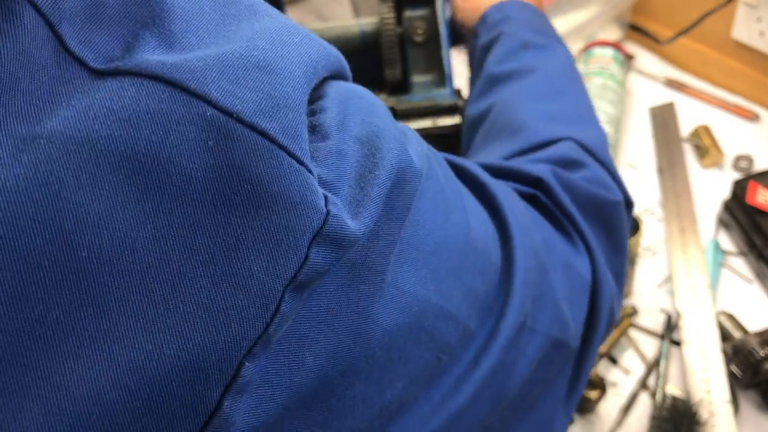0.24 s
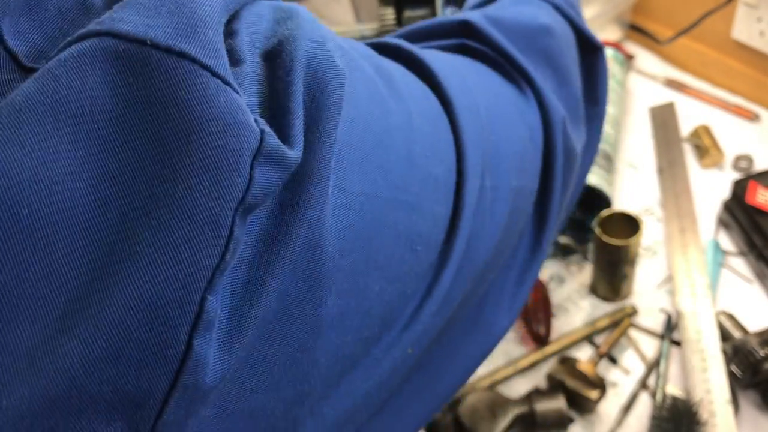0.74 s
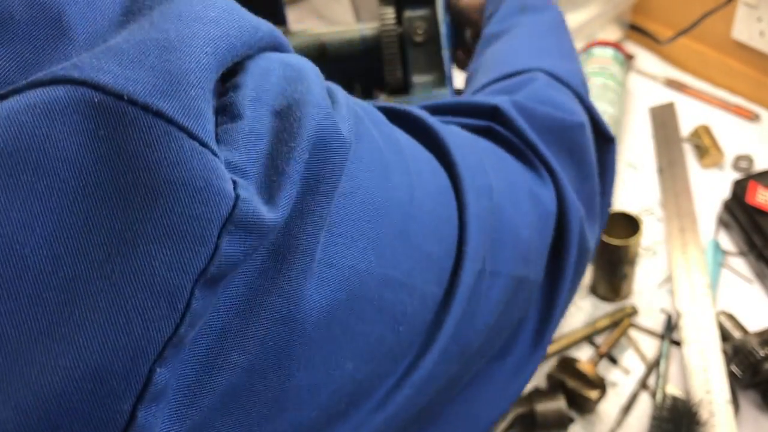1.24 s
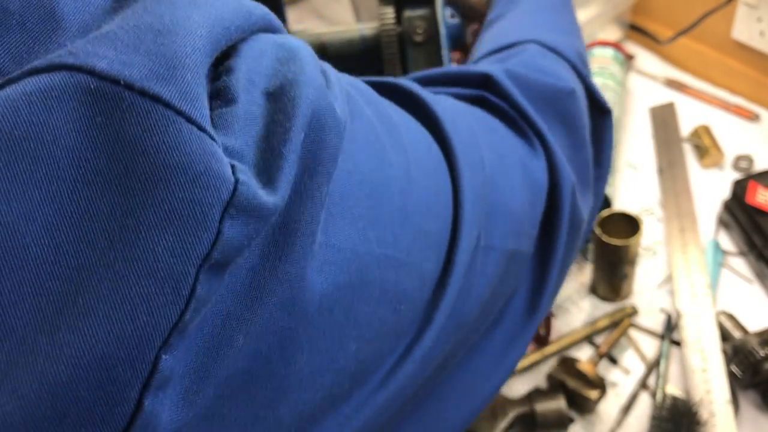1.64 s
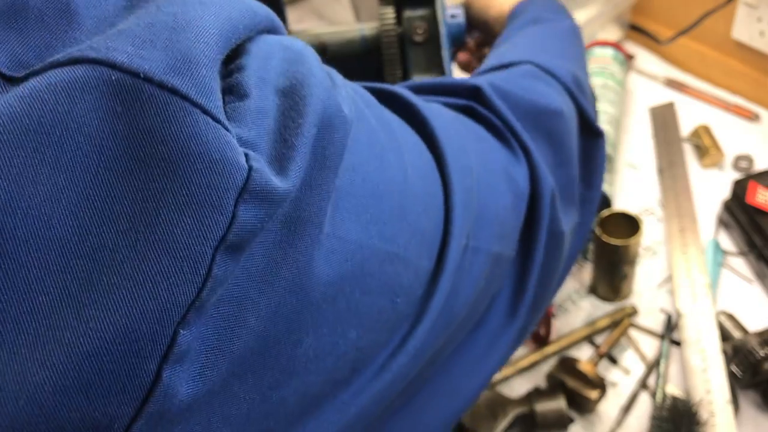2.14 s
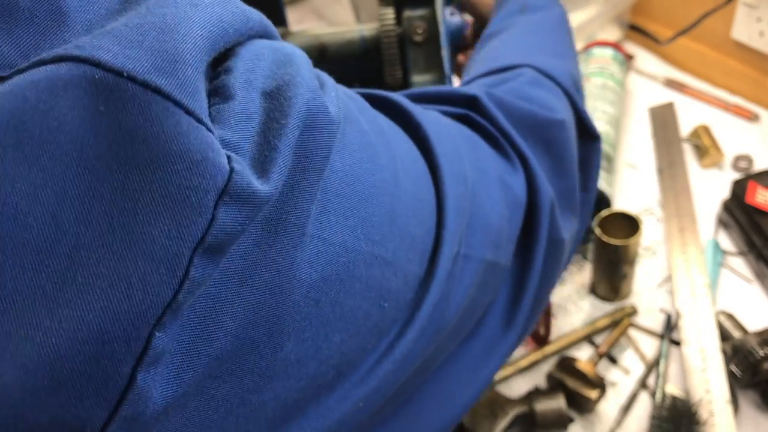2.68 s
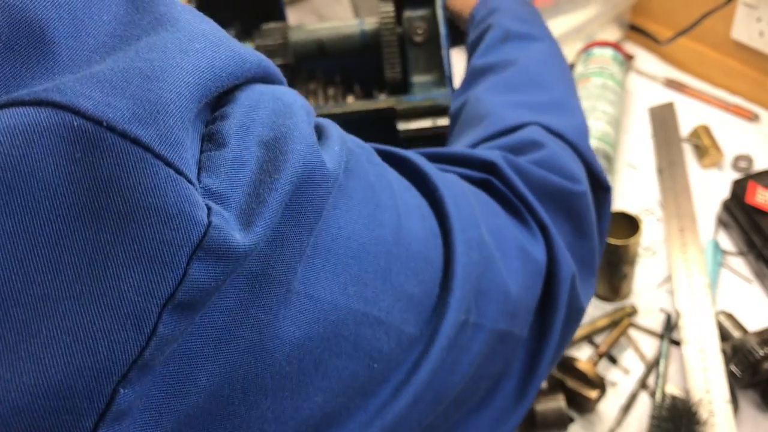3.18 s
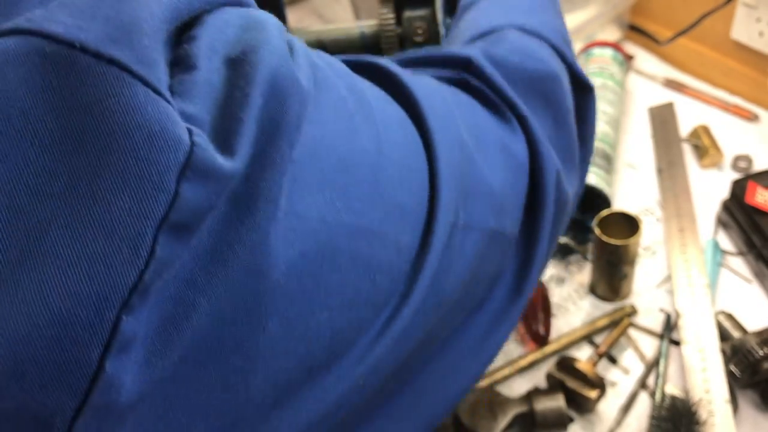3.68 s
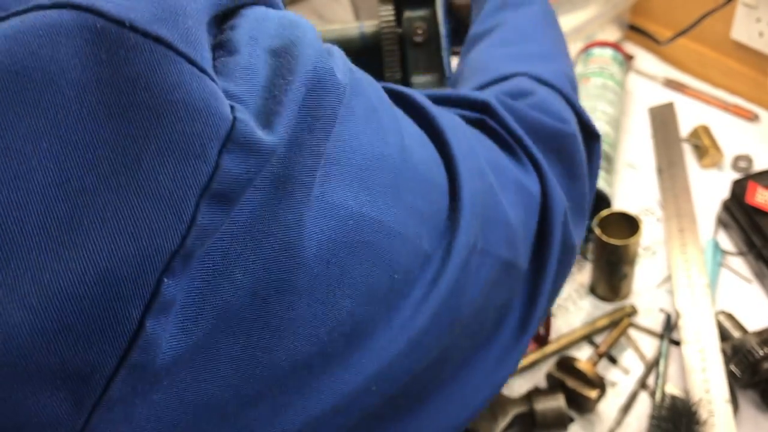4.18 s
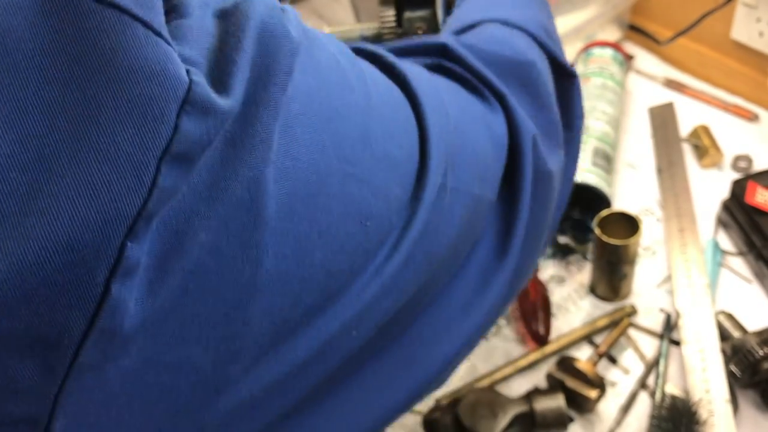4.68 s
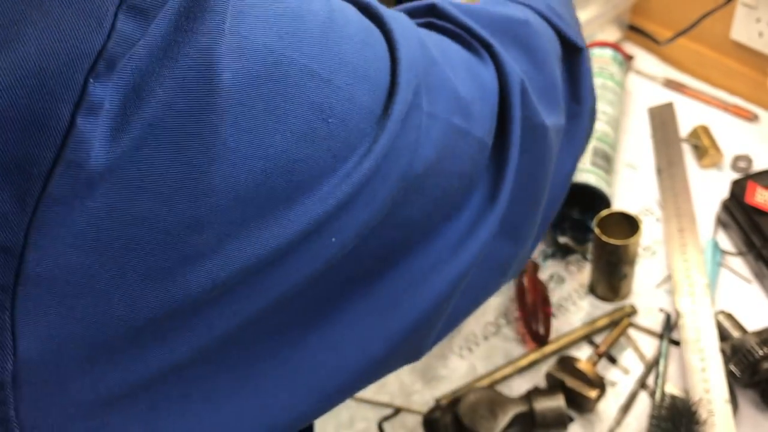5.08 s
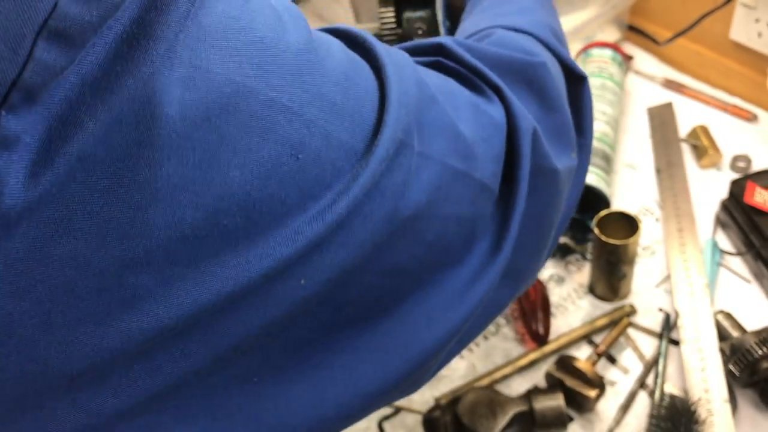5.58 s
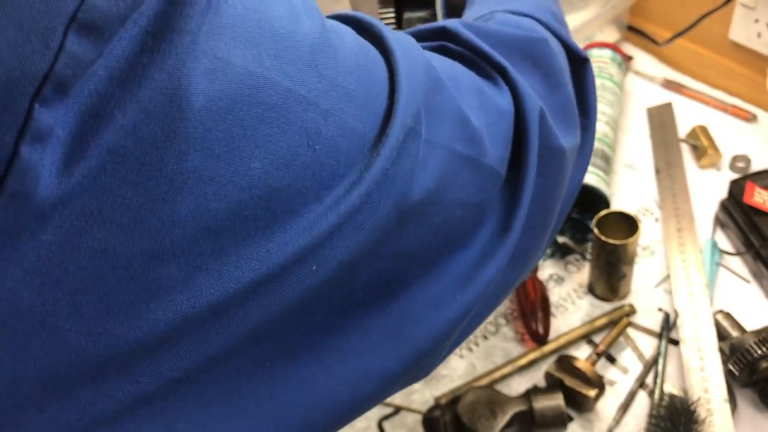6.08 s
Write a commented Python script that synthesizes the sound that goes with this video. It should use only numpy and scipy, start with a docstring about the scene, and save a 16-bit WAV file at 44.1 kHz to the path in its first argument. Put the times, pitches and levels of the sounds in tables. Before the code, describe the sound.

Steel gears are turned slowly by hand, close to one microphone in a small workshop. A spring-loaded ball snaps into its seat together with a loud clunk, then clicks a few more times. In the middle comes a busier run of clunks, taps and bright ticks that thump the bench over a low rolling rumble. Two more snaps and a tiny squeak end it. A sleeve brushes softly over a faint hum.

```python
"""Lathe change gears turned by hand

Close to the bench in a small workshop, one microphone. A spring-loaded ball snaps into its seats, gears
clunk against their stops, teeth tap, and bare steel ticks and squeaks once. Snaps, clunks and taps shake
the bench; the iron lathe bed rings on and the room answers. Underneath, the gears rumble as they roll,
a shaft slides and a sleeve brushes along, over still air and a faint mains hum."""
import sys
import numpy as np
from scipy import signal
from scipy.fft import rfft, irfft
from scipy.io import wavfile
from scipy.ndimage import uniform_filter1d

SR = 44100
rng = np.random.default_rng(int(sys.argv[2]) if len(sys.argv) > 2 else 0)


def waveform_to_disk(signal):
    """Save audio, clipped to [-1, 1], as 16-bit WAV at the path in sys.argv[1]."""
    frames = np.transpose(np.atleast_2d(signal))
    scaled = np.clip(frames, -1, 1) * 32767
    samples = np.round(scaled).astype(np.int16)
    wavfile.write(sys.argv[1], SR, samples)


N = 279152
BLOW_SAMPLES = 8192
HZ = np.fft.rfftfreq(BLOW_SAMPLES, 1 / SR)  # frequency axis of every response
TIME = np.arange(N) / SR


def gain_of(db):
    """Decibels to amplitude."""
    return 10 ** (np.asarray(db) / 20)

def unit_rms(x):
    """Scales to an rms of one."""
    return x / np.sqrt(np.mean(x ** 2) + 1e-20)

def curve(points, hz):
    """Joins (frequency, value) points by straight lines on a log-frequency axis."""
    point_hz, value = np.transpose(points)
    return np.interp(np.log(hz + 1), np.log(point_hz + 1), value)

def add(mix, s, sound):
    """Mixes a sound in at time s."""
    part = mix[round(s * SR):][:len(sound)]
    part += sound[:len(part)]

def noise(response):
    """Steady noise of rms one, coloured by a response."""
    colour = np.interp(np.fft.rfftfreq(N, 1 / SR), HZ, response)
    return unit_rms(irfft(rfft(rng.standard_normal(N)) * colour, N))

def strokes(rows):
    """Gain of hand movements, each swelling and fading in one arch."""
    return sum(gain_of(db) * np.cos(np.pi * np.clip((TIME - middle) / length, -.5, .5))
               for middle, length, db in rows)

def body(modes, floor):
    """Response of a part: resonance peaks over a floor of dense lesser modes."""
    peaks = sum(gain_of(db) ** 2 / (1 + 2 * ((HZ - hz) / width) ** 2) ** 2 for hz, width, db in modes)
    return np.sqrt(peaks + gain_of(curve(floor, HZ)) ** 2)

def ring(response):
    """Minimum-phase spectrum of a response, so that it rings only after the blow."""
    log_gain = np.log(np.maximum(response, 1e-5))
    mirrored = np.concatenate([log_gain, log_gain[-2:0:-1]])
    return np.exp(np.conj(signal.hilbert(mirrored)))[:len(HZ)]

def chatter(spread_s, rise_s):
    """Nearly flat spectrum of a blow that rebounds through the metal for some milliseconds."""
    t = np.arange(BLOW_SAMPLES) / SR
    attack = 1 - np.exp(-t / rise_s)
    burst = rng.standard_normal(BLOW_SAMPLES) * attack * np.exp(-t / spread_s)
    for _ in range(6):  # even out the spectrum while keeping the burst short
        flat = irfft(np.exp(1j * np.angle(rfft(burst))))
        burst = flat * np.exp(-(t / spread_s / 4) ** 2)
    return rfft(burst * attack)

def blow(response, spread_s, rise_s, energy_s):
    """One blow on a part, with the energy of energy_s seconds at an rms of one."""
    sound = irfft(chatter(spread_s, rise_s) * ring(response))
    return sound / np.sqrt(np.sum(sound ** 2) / (energy_s * SR))


# room tone of the workshop: (frequency [Hz], relative level [dB])
AIR_COLOUR = [(20, -16.5), (30, -13), (44, 12.5), (65, -4), (100, -4), (160, -7), (250, -3), (400, -9),
              (1200, -14.5), (2500, -18), (5000, -23), (10000, -26), (15000, -24)]

def still_air(db=-60):
    """Still air all around the microphone: steady noise, mostly low rumble."""
    return gain_of(db) * noise(gain_of(curve(AIR_COLOUR, HZ)))

def mains_hum(hz=100, db=-68):
    """Faint mains hum in the background, one pure tone."""
    return gain_of(db) * np.sin(2 * np.pi * hz * TIME)


# reverberation of the workshop: (frequency [Hz], time to fall 60 dB [s])
ROOM_DECAY = [(100, 0.28), (300, 0.36), (1000, 0.34), (2200, 0.44), (4500, 0.33), (9000, 0.33),
              (15000, .22)]
# echo against direct sound at the microphone: (frequency [Hz], level [dB])
ROOM_COLOUR = [(60, -5.5), (130, -7.5), (400, -3.5), (1500, -10), (4000, -9), (7300, -12), (8700, -8.5),
               (10000, -13), (15000, -13)]

def room(direct, gap_s=0.011, rise_s=0.0018):
    """Echoes off the near walls: dense reflections, each band dying at its own speed."""
    hz, t, bands = signal.stft(rng.standard_normal(SR), SR, nperseg=256)
    decay = np.exp(-np.log(1000) * t / curve(ROOM_DECAY, hz)[:, None])
    spectrum = rfft(signal.istft(bands * decay, SR, nperseg=256)[1][:SR])
    # a cluttered room favours no single pitch
    local_power = uniform_filter1d(uniform_filter1d(abs(spectrum) ** 2, size=30), size=40)
    colour = gain_of(curve(ROOM_COLOUR, np.arange(len(spectrum))))
    fade_in = np.clip(np.arange(SR // 2) / SR / rise_s, 0, 1)
    tail = irfft(spectrum / np.sqrt(local_power) * colour)[:SR // 2] * fade_in
    return signal.fftconvolve(direct, np.pad(tail, (round(gap_s * SR), 0)))[:N]


# hiss of the cloth: (frequency [Hz], relative level [dB])
SLEEVE_COLOUR = [(100, -4), (600, -3.5), (2000, -4), (5000, -6.5), (9000, -9), (15000, -10)]
# the arm moves over the bench: (middle [s], length [s], level [dB])
ARM_MOVES = [(.75, 0.49, -71), (3.8, 1.33, -62), (4.75, 1.37, -63.5), (6.3, 0.32, -60)]

def sleeve(rest_db=-69.5, flutter_db=2.5, fold_s=.06):
    """Cloth hisses softly, more when the arm moves, and unevenly as its folds pass."""
    folds = np.interp(TIME / fold_s, np.arange(SR), rng.standard_normal(SR))
    pressure = np.hypot(gain_of(rest_db), strokes(ARM_MOVES)) * gain_of(flutter_db * folds)
    return pressure * noise(gain_of(curve(SLEEVE_COLOUR, HZ)))


# the shaft moves in its bore: (middle [s], length [s], level [dB])
SLIDES = [(1.69, 0.23, -75), (3.7, 0.13, -67.5), (4.18, 0.2, -65), (4.37, 0.092, -66.5)]

def sliding_shaft(hz=3400, width_hz=730):
    """Oiled steel slides: friction noise in one broad resonance."""
    return strokes(SLIDES) * noise(1 / (1 + ((HZ - hz) / width_hz) ** 2) ** 2)


# low resonances of the bench top, the lowest a slow mode of the room: (frequency [Hz], width [Hz], level [dB])
BENCH_MODES = [(45, 7.2, -3.5), (93.8, 20, -2), (128.2, 38, 1.5), (165.3, 49, -9.5), (229.5, 23.4, -14.5)]
# its lesser modes: (frequency [Hz], level [dB])
BENCH_FLOOR = [(20, -55), (60, -37), (180, -50), (280, -28), (400, -26), (700, -70.5), (3000, -99)]

def bench_response():
    """The bench under the lathe answers with a few low resonances, and the room with one slow, deep one."""
    return body(BENCH_MODES, BENCH_FLOOR)


# resonances of one gear wheel: (frequency [Hz], width [Hz], level [dB])
WHEEL_MODES = [(875, 49, -1.5), (1036, 106, -5.5), (1269, 51, 5), (1503, 71, -3.5), (1816, 96, -2),
               (1880, 99, -1), (2110, 28, -11), (2592, 60, -10), (2866, 34, -9)]
# its lesser modes: (frequency [Hz], level [dB])
WHEEL_FLOOR = [(30, -37), (300, -17), (650, -17.5), (900, -13), (1600, -21.5), (2500, -21), (4500, -24),
               (7000, -34), (16000, -40)]

def wheel_response():
    """A single wheel rings in the midrange when its teeth are touched."""
    return body(WHEEL_MODES, WHEEL_FLOOR)

def gear_load(free_db=-67, against_thump_db=-28, rise_db_per_s=86.5, fall_db_per_s=58.5):
    """Gain of the rolling: the load builds up to each clunk and eases off after it."""
    power = gain_of(free_db) ** 2
    for s, _, _, thump_db in CLUNKS:
        drop_db = np.maximum(rise_db_per_s * (s - TIME), fall_db_per_s * (TIME - s))
        power = power + gain_of(thump_db + against_thump_db - drop_db) ** 2
    return np.sqrt(power)

def rolling_gears(teeth_db=-12, grain_db=4.0, grains_per_s=900):
    """Turning gears rumble through the bench while their teeth scrape in small uneven grains."""
    grains = (rng.random(N) < grains_per_s / SR) * rng.standard_normal(N)
    grains *= gain_of(grain_db * np.minimum(rng.exponential(1, N), 3))
    wheel_ring = blow(wheel_response(), spread_s=0.0045, rise_s=0.00068, energy_s=1)
    teeth = unit_rms(signal.oaconvolve(grains, wheel_ring)[:N])
    return gear_load() * (noise(bench_response()) + gain_of(teeth_db) * teeth)


# modes of the cast lathe bed: (frequency [Hz], relative level [dB])
LATHE_BED_MODES = [(428, -5), (858, -8), (1013, -27), (1081, 9), (1212, 2), (1483, 6), (1925, -0.5),
                   (2109, 14.5), (2327, 9.5), (2443, 9), (2625, -18), (2785, -19)]

def lathe_bed(blows, t60_s=0.23, db=-7):
    """Lightly damped modes of the iron bed, set ringing by the blows."""
    t = np.arange(SR // 2) / SR
    decay_rate = np.log(1000) / t60_s
    modes = sum(gain_of(mode_db) * np.sin(2 * np.pi * hz * t) for hz, mode_db in LATHE_BED_MODES)
    ringing = 2 * decay_rate / SR * np.exp(-decay_rate * t) * modes
    return gain_of(db) * signal.fftconvolve(blows, ringing)[:N]

def squeak(s=6.228, length_s=0.04, start_hz=15050, end_hz=13300, db=-58):
    """Dry steel slips with one thin, falling whistle."""
    progress = np.linspace(0, 1, round(length_s * SR))
    hz = start_hz + (end_hz - start_hz) * progress ** 2.4
    out = np.zeros(N)
    add(out, s, gain_of(db) * np.sin(np.pi * progress) * np.sin(2 * np.pi * np.cumsum(hz) / SR))
    return out


# high ring of bare steel: (frequency [Hz], width [Hz], level [dB])
STEEL_MODES = [(4340, 38, -2), (7030, 150, -8), (8740, 490, -7.5), (9420, 240, -6), (11320, 220, -5.5),
               (12200, 180, -10.5), (14410, 120, 0)]
# its lesser modes: (frequency [Hz], level [dB])
STEEL_FLOOR = [(30, -54.5), (400, -44), (800, -17), (2500, -14), (3400, -17), (5000, -12.5), (8500, -12),
               (10200, -14.5), (12500, -10.5), (15500, -14)]
# steel clicks on steel: (time [s], level [dB], brightness [dB/octave], wheel ring [dB], cutoff [Hz])
TICKS = [(.4420, -36, -2, -7.5, 10000), (1.405, -59, 1, -2, 15000), (2.7044, -52, 13, -26, 15800),
         (3.0110, -29, 3, 4.5, 17000), (3.4354, -28.5, -7, 1, 14000), (3.7435, -29.5, 3, 6, 15900),
         (4.3999, -29.5, 3.5, 5, 17000), (4.699, -39, 1.5, -8, 10100), (5.0207, -50, 14, -15.5, 17400)]

def steel_ticks():
    """Very hard, light contacts: bright steel, with some ring of the wheel that was touched."""
    out = np.zeros(N)
    steel, wheel = body(STEEL_MODES, STEEL_FLOOR), wheel_response()
    octaves = np.log2(np.maximum(HZ, 400) / 1000)
    for s, db, brightness, wheel_db, cutoff_hz in TICKS:
        contact = gain_of(brightness * octaves) / np.sqrt(1 + (HZ / cutoff_hz) ** 8)
        response = np.hypot(steel, gain_of(wheel_db) * wheel) * contact
        add(out, s, gain_of(db) * blow(response, spread_s=0.007, rise_s=0.00077, energy_s=0.0068))
    return out

def hits(rows, modes, floor, vary_db, spread_s, rise_s, bench_lag_s, bench_spread_s):
    """Each hit rings the metal, brighter when the contact is harder; the bench follows a moment later."""
    out, bench = np.zeros(N), bench_response()
    octaves = np.log2(np.clip(HZ, 700, 6000) / 1000)
    for s, db, brightness, thump_db in rows:
        # each point of contact favours other resonances
        struck = [(hz, width, mode_db + vary_db * rng.standard_normal()) for hz, width, mode_db in modes]
        response = body(struck, floor) * gain_of(brightness * octaves)
        metal = blow(response, spread_s, rise_s, energy_s=0.0099)
        thump = blow(bench, bench_spread_s, rise_s=0.0023, energy_s=0.0086)
        add(out, s, gain_of(db) * metal)
        add(out, s + bench_lag_s, gain_of(thump_db) * thump)
    return out


# teeth touch as the slack is taken up, and once the bench rocks back after a clunk: (time [s], level [dB],
# bench thump [dB])
TAPS = [(0.297, -48.5, -48), (0.307, -54, -43), (1.1700, -58, -46), (2.7710, -56, -48),
        (3.0420, -38.5, -37), (3.2460, -54.5, -48.5), (3.3390, -56, -42), (3.4620, -52, -25),
        (3.778, -47.5, -40), (3.8200, -47.5, -48), (3.843, -47, -41), (4.5000, -71, -41),
        (4.5630, -48, -39)]
# the ball lifts out of a seat, then the gear settles: (time [s], level [dB], wait to settle [s])
LIFTS = [(0.2043, -56.5, .02), (1.5658, -47.5, 0.055), (2.0719, -47.5, 0.052), (2.5812, -52.5, .02),
         (5.374, -65, 0.058), (5.8802, -54.5, 0.077)]

def wheel_taps(bump_lead_s=.034):
    """Light blows on a wheel: teeth touch, the ball lifts, the gear settles, teeth bed in."""
    # each row: (time [s], level [dB], brightness [dB/octave], bench thump [dB])
    taps = [(s, db, -5.5, thump_db) for s, db, thump_db in TAPS]
    lifts = [(s, db, 0.3, -51.5) for s, db, _ in LIFTS]
    settles = [(s + wait, -60.5, -13, -46) for s, _, wait in LIFTS]
    # the teeth bed in with a dull bump just before every clunk
    bumps = [(s - bump_lead_s, db - 32, -8, thump_db - 13) for s, db, _, thump_db in CLUNKS]
    return hits(taps + lifts + settles + bumps, WHEEL_MODES, WHEEL_FLOOR, vary_db=2.5,
                spread_s=0.006, rise_s=.0025, bench_lag_s=0.0022, bench_spread_s=0.009)


# resonances of the sprung ball and its housing: (frequency [Hz], width [Hz], level [dB])
SNAP_MODES = [(445, 29, -3.5), (506, 42, -8.5), (633, 123, -9), (902, 48, -1.5), (1000, 76, 1.5),
              (1400, 158, -0.5), (1457, 15.5, -1), (1580, 27, -5), (1847, 95, 0), (1946, 41, -21),
              (2196, 44, 1), (2381, 67, 2), (2445, 61, -15), (2654, 61, -5.5), (2803, 40, -8.5),
              (4027, 64, -5.5), (4550, 69, -13.5), (5760, 130, -19.5), (6390, 50, -17.5), (7260, 63, -25.5),
              (9600, 49, -21.5)]
# their lesser modes: (frequency [Hz], level [dB])
SNAP_FLOOR = [(30, -61), (120, -10), (210, -4.5), (330, -13), (800, -17), (2500, -11), (3400, -23.5),
              (4400, -26), (6500, -27.5), (8500, -36), (10500, -44.5), (16000, -49)]
# the ball finds a seat: (time [s], level [dB], brightness [dB/octave], bench thump [dB])
SNAPS = [(.3570, -21, 1.5, -32), (.4338, -26.5, 1.5, -38.5), (1.1355, -53.5, 0, -54),
         (1.3398, -34.5, -0.5, -41.5), (1.7845, -30.5, 1, -37.5), (2.3233, -31, 1, -39),
         (5.6345, -29.5, -0.5, -38), (6.1933, -33.5, -3, -39.5)]

def ball_snaps():
    """Close by, the spring drives the ball into a seat and its housing rings sharply."""
    return hits(SNAPS, SNAP_MODES, SNAP_FLOOR, vary_db=1.66,
                spread_s=.0065, rise_s=0.0003, bench_lag_s=0.01125, bench_spread_s=0.016)


# resonances of the gear train and its casting: (frequency [Hz], width [Hz], level [dB])
CLUNK_MODES = [(405, 46, -9.5), (542, 69, -6.5), (632, 43, -4.5), (866, 155, -4), (1010, 70, -2),
               (1205, 66, -4), (1448, 86, -2), (1788, 66, -2), (1927, 63, -4.5), (2183, 38, -4),
               (2348, 45, -8.5), (2465, 70, -12), (2744, 290, -13.5), (4030, 61, -8.5), (4090, 480, -25),
               (9700, 57, -27.5)]
# their lesser modes: (frequency [Hz], level [dB])
CLUNK_FLOOR = [(30, -54.5), (150, -25), (320, -12), (800, -18.5), (1200, -12), (2500, -16.5), (3500, -24.5),
               (5000, -33), (6500, -30), (9000, -58), (16000, -54)]
# a gear meets its stop: (time [s], level [dB], brightness [dB/octave], bench thump [dB])
CLUNKS = [(0.3571, -15.5, 1.5, -18.5), (.3745, -26.5, 4, -51), (3.0488, -38, -8.5, -34.5),
          (3.4337, -27, -2.5, -22), (3.8963, -26, -2.1, -17.5), (4.2470, -39, -5, -29.5),
          (4.5959, -25.5, -0.5, -25), (4.6778, -38, -2, -43), (6.3240, -41, -19.5, -63)]

def gear_clunks():
    """Right at the microphone, a gear runs against its stop and the whole train rings."""
    return hits(CLUNKS, CLUNK_MODES, CLUNK_FLOOR, vary_db=1.75,
                spread_s=.008, rise_s=0.00064, bench_lag_s=0.00682, bench_spread_s=0.00345)

def scene():
    """The mechanism, its echoes and the quiet workshop, in mono from beside the bench."""
    metal = ball_snaps() + gear_clunks() + wheel_taps() + steel_ticks() + squeak()
    background = still_air() + mains_hum()
    ringing = lathe_bed(metal) + room(metal)
    friction = rolling_gears() + sliding_shaft() + sleeve()
    return (background + friction + ringing + metal)[None]

def record(dry):
    """The microphone's low cut and the recorder's band limit."""
    low_cut = signal.butter(N=2, Wn=24.5, btype="high", fs=SR, output="sos")
    band_limit = signal.firwin(255, cutoff=16000, window=("kaiser", 7), fs=SR)
    return signal.oaconvolve(signal.sosfilt(low_cut, dry), band_limit[None], "same")


dry = scene()
out = record(dry)
waveform_to_disk(out)
```